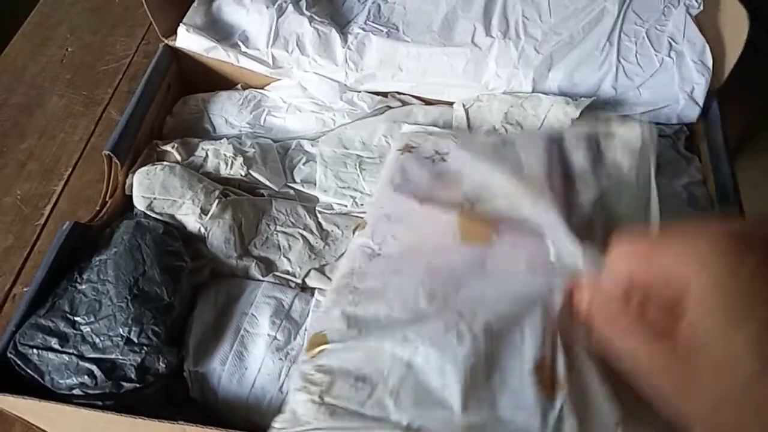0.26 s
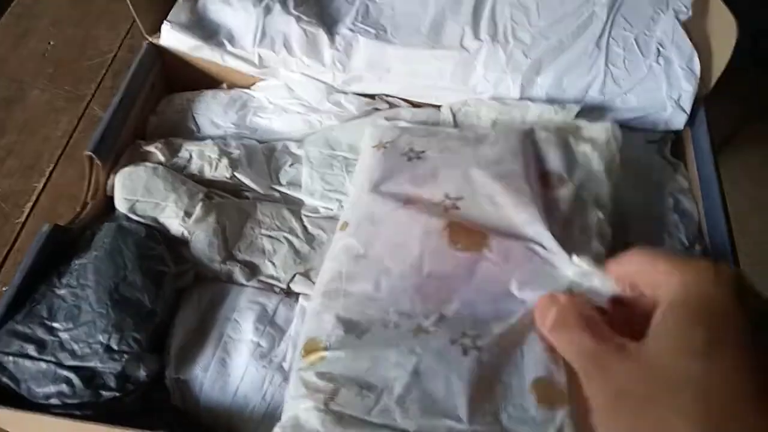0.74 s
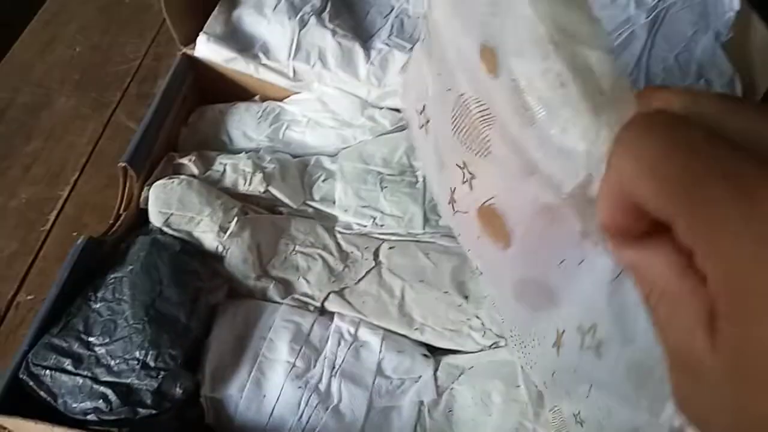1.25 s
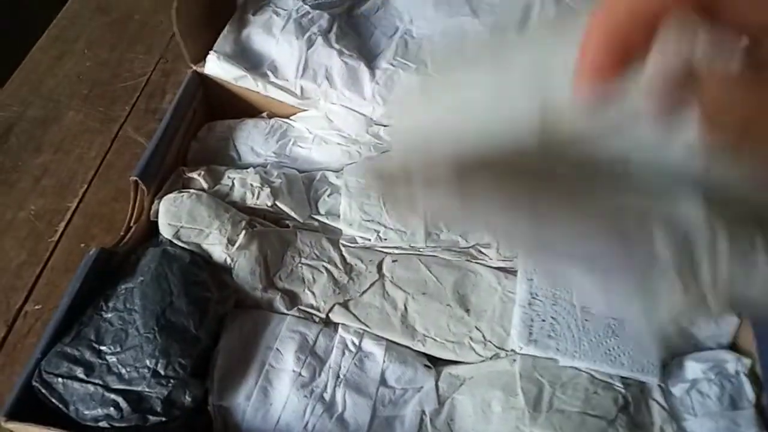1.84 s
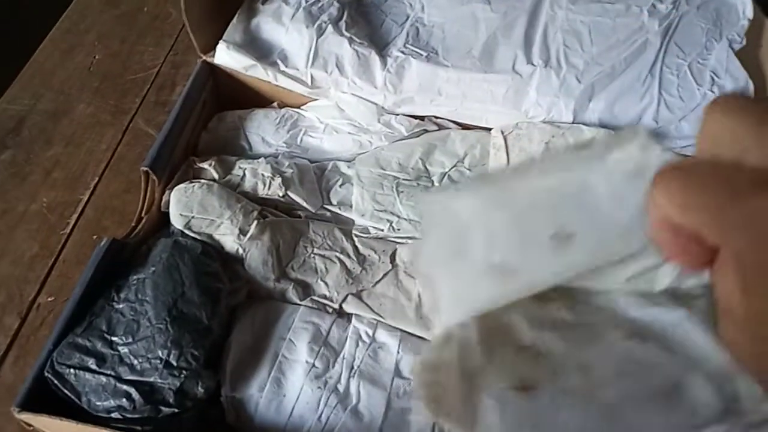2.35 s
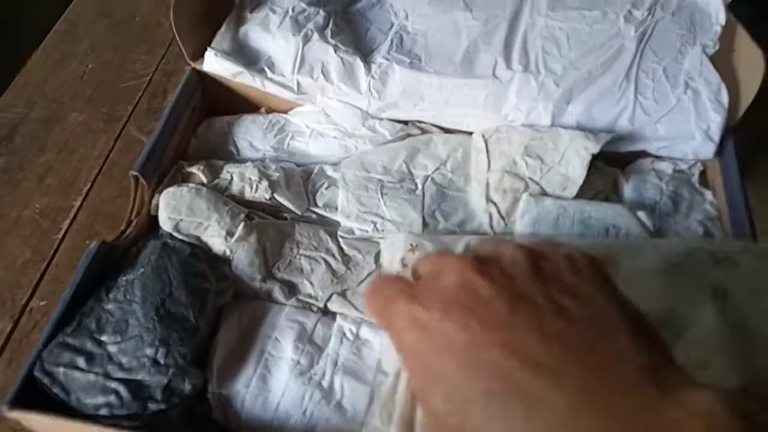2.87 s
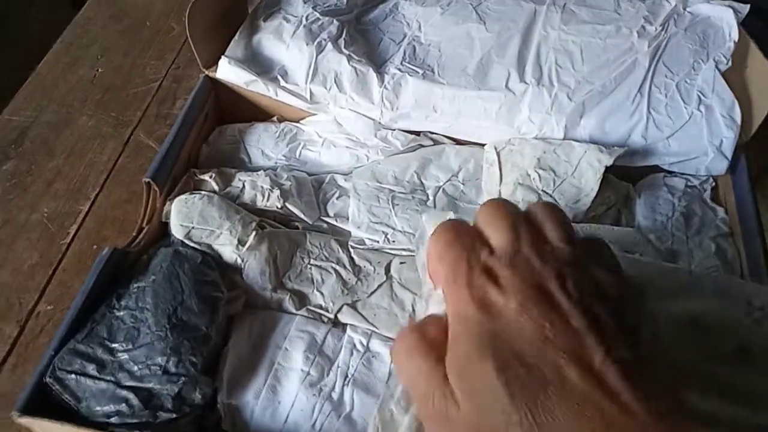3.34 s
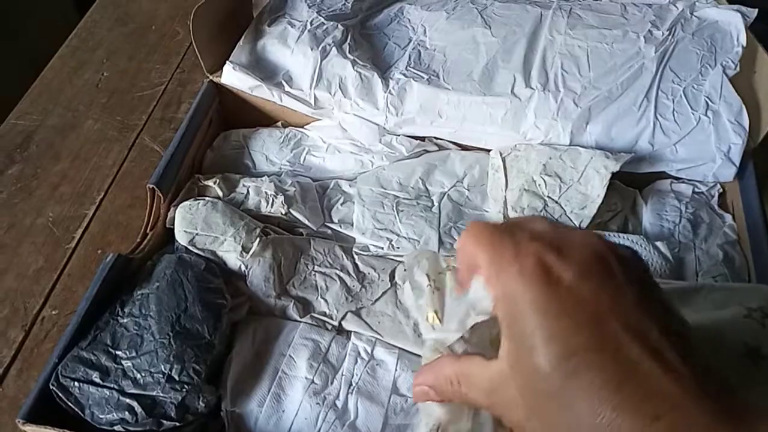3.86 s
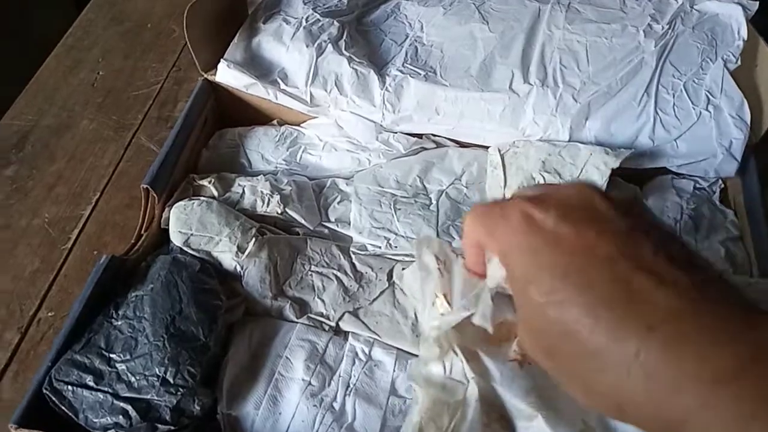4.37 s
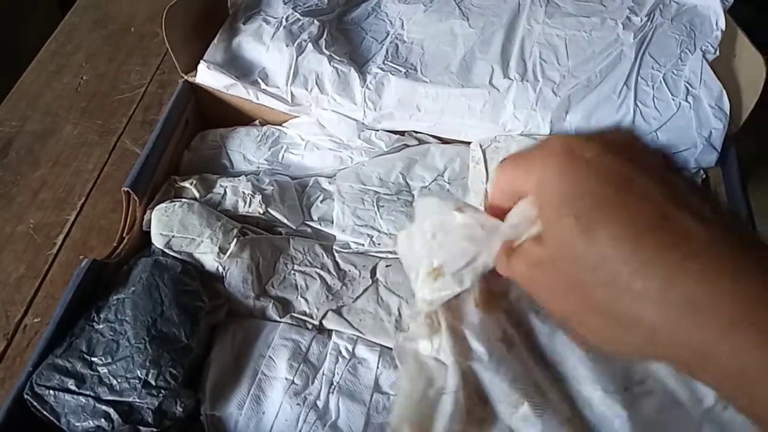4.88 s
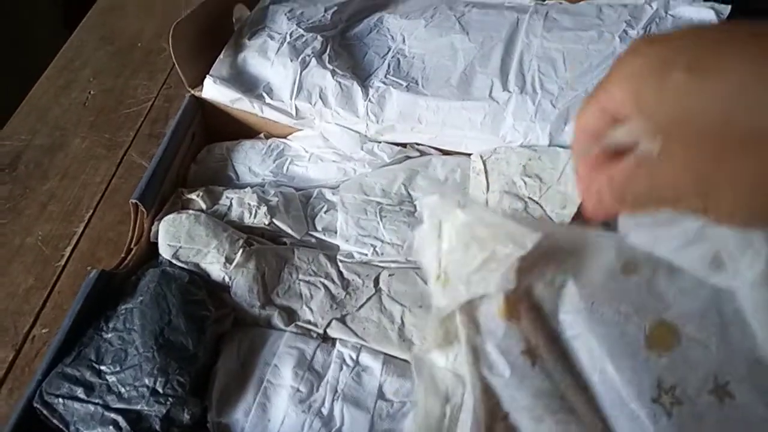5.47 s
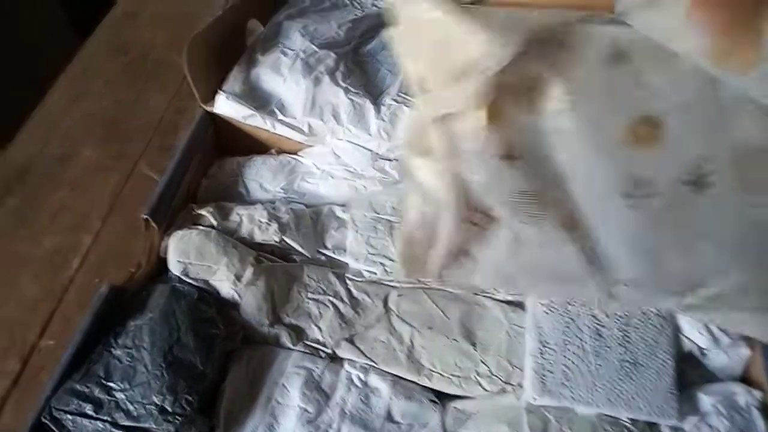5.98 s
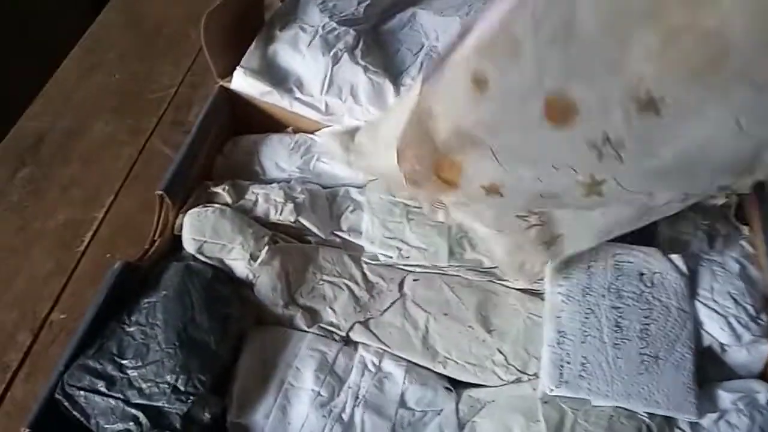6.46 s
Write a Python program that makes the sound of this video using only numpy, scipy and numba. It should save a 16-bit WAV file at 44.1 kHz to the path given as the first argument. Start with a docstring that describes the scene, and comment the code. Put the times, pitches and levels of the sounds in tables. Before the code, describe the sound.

Close, crisp rustling of thin wrapping paper in uneven tugs, full of sharp crackles, with a short hoarse squeal in an early lull.

```python
"""A small quiet room, with a phone's two microphone ports close to a packed box under tissue paper.
A hand crumples and drags the paper: creases are a dense hail of filtered noise bursts, with louder snaps.
The sheet slides as fine hiss and flaps low; bumps of the box are short dying sines.
Hoarse gliding sines make a brief paper squeak early on and a short rising squeal, perhaps a bird, in a
lull; a faint hum wavers behind."""
import sys
import numpy as np
from scipy import signal
from scipy.fft import rfft, irfft
from scipy.io import wavfile
from scipy.ndimage import uniform_filter1d, map_coordinates
from numba import njit

SR = 44100
rng = np.random.default_rng(int(sys.argv[2]) if len(sys.argv) > 2 else 0)


def log_audio(samples):
    """Write samples as a 16-bit WAV file to the path given in sys.argv[1]."""
    # one column per channel
    frames = np.atleast_2d(samples).T
    # limit to full scale, then quantise
    limited = np.clip(frames, -1, 1)
    pcm = np.round(limited * 32767).astype(np.int16)
    wavfile.write(sys.argv[1], SR, pcm)


N = 296382


def undb(db):
    """Amplitude ratio of a level in dB."""
    return 10 ** (np.asarray(db) / 20)


def rms(x):
    """Root mean square over all ports and samples."""
    return np.sqrt(np.mean(x ** 2))


def walk(rate):
    """Random levels held 1 / rate seconds and slewed, scaled to an rms of 1."""
    hold = int(SR / rate)
    steps = np.repeat(rng.standard_normal(N // hold + 1), hold)
    slewed = uniform_filter1d(steps, hold)[:N]
    return slewed / rms(slewed)


def colour(x, points):
    """Causal minimum-phase filter through (hz, db) points, by way of the cepstrum."""
    hz, db = np.transpose(points)
    bins = np.arange(1025) * SR / 2048
    gain_db = np.interp(np.log(bins + 1), np.log(hz), db)
    cepstrum = irfft(np.log(undb(gain_db)))
    cepstrum[1:1024] *= 2  # fold the negative times onto the positive: the filter never rings early
    cepstrum[1025:] = 0
    return signal.fftconvolve(x, irfft(np.exp(rfft(cepstrum))))[:N]


# Quiet room, colour of the hiss; its overall level is set apart: hz, relative_level_db
AIR_COLOUR = [(18, -65), (30, -6), (512, 7), (721, -1), (1810, 5), (2120, -9), (3770, -3), (16000, -39)]
AIR_DB = -62  # rms of the hiss
# Faint hum behind the paper, before its wavering: time_s, level_db
HUM_LEVEL = [(0, -74), (1.2, -63), (1.9, -75), (3.1, -64.5), (3.8, -73), (5, -63.5), (6.72, -84)]


def air():
    """Quiet room noise, separate at each port, and a low hum that wavers in pitch and level."""
    hiss = np.array([colour(rng.standard_normal(N), AIR_COLOUR) for _ in range(2)])
    pitch_hz = 62. + 2.3 * walk(12)
    level_db = np.interp(np.arange(N) / SR, *np.transpose(HUM_LEVEL)) + 4 * walk(9)
    hum = np.sin(2 * np.pi * np.cumsum(pitch_hz) / SR) * undb(level_db)
    return hiss * undb(AIR_DB) / rms(hiss) + hum


ROOM_T60_S, ROOM_DB, ROOM_ALIKE_HZ = 0.17, -12, 614  # decay, tail level, alike at both ports below this


def room(x):
    """Tails of dying noise, alike at both ports in the bass; they change as the hands move about."""
    t, hop = np.arange(int(.4 * SR)) / SR, 8192
    low = signal.butter(2, ROOM_ALIKE_HZ, fs=SR)
    dull = signal.butter(2, 5500., fs=SR)  # paper and cloth soak up the treble
    padded = np.pad(x, ((0, 0), (hop, 2 * hop)))
    wet = np.zeros((2, padded.shape[1] + len(t)))
    for i in range(0, N + hop, hop):  # overlapping windows, each with a fresh tail
        own, both = rng.standard_normal((2, len(t))), rng.standard_normal(len(t))
        tail = own + signal.filtfilt(*low, both - own)
        dying = undb(-60 * t / ROOM_T60_S) * (t > .002)
        tail = signal.lfilter(*dull, tail * dying)
        tail *= undb(ROOM_DB) / np.sqrt(np.sum(tail ** 2, 1, keepdims=True))
        window = padded[:, i:i + 2 * hop] * np.hanning(2 * hop)
        part = signal.fftconvolve(window, tail, axes=1)
        wet[:, i:i + part.shape[1]] += part
    return x + wet[:, hop:hop + N]


# A brief paper squeak early on, then the rising squeal in the lull; levels before wavering,
# hoarseness and placing, octave relative to the note:
# start_s, end_s, start_hz, end_hz, level_db, octave_db
SQUEAL_NOTES = [(0.326, 0.335, 3510, 3460, -33.5, -14), (2.05, 2.105, 2400, 2750, -44, -14),
                (2.195, 2.241, 3750, 4350, -46, -3), (2.084, 2.147, 2750, 3010, -33.5, -13),
                (2.128, 2.297, 2950, 2910, -46, -14), (2.158, 2.262, 3700, 3700, -45.5, -2.5),
                (2.166, 2.324, 3300, 3320, -35.5, -2.5), (2.205, 2.298, 3920, 3940, -40, 0.5),
                (2.23, 2.328, 4210, 4280, -45.5, -2), (2.242, 2.33, 3560, 3710, -40, -8)]


def squeal():
    """Hoarse gliding notes with octaves, mostly on the left; the squeal steps up and splits into strands."""
    t, out = np.arange(N) / SR, 0
    for start, end, start_hz, end_hz, db, octave_db in SQUEAL_NOTES:
        hz = np.interp(t, (start, end), (start_hz, end_hz)) * (1 + 0.00445 * walk(150))
        phase = 2 * np.pi * np.cumsum(hz) / SR
        arch = np.sin(np.pi * np.clip((t - start) / (end - start), 0, 1))
        swell = arch ** 0.27 * undb(db + 3.4 * walk(63))
        # uneven cycles spread each line into a band
        hoarse = 1 + 4.5 * signal.lfilter(*signal.butter(3, 300, fs=SR), rng.standard_normal(N))
        out = out + swell * hoarse * (np.sin(phase) + undb(octave_db) * np.sin(2 * phase))
    return out * undb([[4.], [-7.]])


# Where the paper lies from the ports; the balance is used relative to its mean over time:
# time_s, left_minus_right_db, left_later_ms
PAPER_PLACE = [(0, 3.5, 1.15), (.4, 4.5, 1.19), (.7, 6, 1.18), (1.29, 2.5, 1.3), (1.75, 5.5, 1.2),
               (2.3, 5.5, 1.1), (3.3, 6, 1.167), (4.1, 7, 1.17), (4.8, 4.5, 1.17), (5.2, 2, 1.29),
               (5.8, 4, 1.285), (6.14, 1, 1.32), (6.72, 5.5, 1.36)]


def late(s):
    """Samples by which the left port hears the paper later."""
    when, _, ms = np.transpose(PAPER_PLACE)
    return np.interp(s, when, ms) * SR / 1000


# The hand or the parcel bumps the box: start_s, envelope_peak_db, pitch_hz
BOX_BUMPS = [(3.974, -38, 190), (4.307, -41, 322), (4.532, -36, 240), (5.3, -41, 170), (5.622, -39, 160),
             (5.94, -38.5, 150), (6.228, -39, 210)]
THUMP_S = .011  # a bump is fullest at half this time


def thumps():
    """Soft low sine bumps that die at once; the left port hears them later."""
    t, out = np.arange(N) / SR, np.zeros((2, N))
    for s, db, hz in BOX_BUMPS:
        u = np.maximum(t - s - np.array([[late(s) / SR], [0]]), 0)
        envelope = np.e * u / THUMP_S * 2 * np.exp(-2 * u / THUMP_S)
        out += undb(db) * envelope * np.sin(2 * np.pi * hz * u)
    return out


@njit
def buckle(start, lag, size, pan, hz, sharp, fade, ring, noise):
    """Each crease lets go a bare tick and a longer burst that rings a patch of sheet."""
    out = np.zeros((2, len(noise) + 4096))
    for e in range(len(start)):
        g, damping = np.tan(np.pi * hz[e] / SR), 1 / sharp[e]
        band, low, level = 0., 0., 1.
        ring_gain = np.sqrt(SR * sharp[e] / hz[e] / 8)
        i = start[e]
        while level > .01 and i < len(noise):
            burst = 4 * level * (1 - level) * noise[i]  # swells, then dies
            v = (band + g * (burst - low)) / (1 + g * (g + damping))  # resonant band-pass
            band, low = 2 * v - band, low + 2 * g * v
            tick = level ** 8 * (noise[i] - noise[i - 1])  # the fold itself: at once, brief and bright
            bare = level * level * burst * 2 + tick
            y = (1 - ring) * bare + ring * damping * v * ring_gain
            out[0, i + lag[e]] += size[e] * y * pan[e]  # the left port hears it later
            out[1, i] += size[e] * y / pan[e]
            level *= fade[e]
            i += 1
    return out[:, :len(noise)]


# Colour of each microphone port: hz, gain_db
LEFT_MIC = [(40, -18.5), (120, -17.5), (330, -9), (550, -12), (820, -13), (1080, -8), (1520, -12.5),
            (2100, -5), (3300, -3), (4900, -7.5), (6400, -1), (8600, -4), (12800, -26.5), (15000, -9.5),
            (16000, 2), (17500, -52)]
RIGHT_MIC = [(40, -25), (120, -16), (330, -13), (520, -15), (1150, -17.5), (1450, -8), (1750, -17.5),
             (2200, -12.5), (2700, -15), (6500, -10), (8100, -20.5), (11500, -3), (13800, -12), (15000, -4),
             (16000, -3), (17500, -46)]


def creases(s, size, pan_db, hz, ms, sharp, ring, spread_s):
    """Bursts from scattered places on the sheet, through the two ports."""
    scatter = SR * spread_s * rng.standard_normal(len(s))
    lag = np.clip(late(s) + scatter, 0, 400).astype(int)
    fade = np.exp(-1000 / (ms * SR))
    out = buckle((s * SR).astype(int), lag, size, undb(pan_db / 2), np.clip(hz, 60., 16000.),
                 sharp + 0 * s, fade, np.clip(ring, 0., 1.), rng.standard_normal(N))
    return np.array([colour(out[0], LEFT_MIC), colour(out[1], RIGHT_MIC)])


# Single loud snaps; the peak is that of the two ports' mean before the room, the balance is
# used relative to the mean of all snaps: start_s, peak_db, ring_hz, left_minus_right_db
LOUD_SNAPS = [(0.045, -19, 2530, 17), (0.1486, -35, 1800, 12), (0.206, -31, 4010, 1),
              (0.2278, -24, 6500, -2), (0.2322, -15.5, 6200, -1), (0.243, -19, 4000, 0),
              (0.261, -24, 6500, 0), (0.2896, -21, 5830, 4), (0.3129, -28, 6600, 3), (0.396, -20, 6730, 0),
              (0.503, -18, 6500, 4), (0.56, -25, 6100, -4), (0.653, -15.5, 4100, 10),
              (0.6734, -19, 2720, 1), (0.6902, -15, 3600, 9), (0.708, -15.5, 3800, 6),
              (0.984, -18, 7400, -2), (1.1939, -14, 6590, -4.5), (1.257, -17, 6200, 6),
              (1.2996, -19, 6400, 2.5), (1.3509, -13, 6300, -1), (1.39, -20, 6600, 6),
              (1.5087, -11.5, 3880, 1), (1.5993, -18, 3540, 4), (1.729, -22, 3000, -3),
              (1.7426, -17, 2600, -7), (1.777, -24, 2420, 13), (1.9224, -16.5, 2720, 5),
              (1.9456, -16.5, 4960, 0), (2.359, -23.5, 5940, 11), (2.392, -17, 3500, 6.5),
              (2.5883, -16.5, 6430, 16), (2.599, -19.5, 7620, 16.5), (2.648, -22, 6050, 9),
              (2.721, -21, 6020, 5.5), (2.739, -19.5, 6320, 14), (2.82, -19, 3770, 20),
              (2.943, -22.5, 7850, 4), (3.132, -12.5, 6230, 9), (3.141, -14, 1970, 9),
              (3.2534, -17, 5950, 6), (3.313, -14.5, 2000, 11), (3.405, -24, 7000, 15),
              (3.461, -22.5, 4200, 2.5), (3.6317, -12, 6550, -3), (3.678, -17, 3560, 0),
              (3.715, -12, 4000, 3), (3.949, -16, 2600, 3), (4.158, -12, 6650, 4), (4.183, -10.5, 6200, 3),
              (4.186, -16, 1050, 5), (4.206, -14.5, 3530, 5.5), (4.2943, -21, 6020, -7),
              (4.2992, -21, 6340, 0), (4.315, -19, 6400, 14), (4.404, -13.5, 6350, 19),
              (4.4454, -20, 6460, 9), (4.6845, -17.5, 6050, 12), (4.787, -17.5, 3900, 9.5),
              (4.822, -19.5, 3420, 10), (4.981, -23, 6700, 11), (4.99, -18, 900, 9), (5.008, -24, 2300, 18),
              (5.032, -21, 6300, -2), (5.0752, -15.5, 7000, -3), (5.104, -16, 4330, 3),
              (5.1703, -21.5, 6600, 3), (5.187, -16, 6330, -5.5), (5.209, -19.5, 6460, 9),
              (5.231, -24, 850, -2), (5.254, -21, 6600, 1), (5.2867, -13.5, 6500, 3),
              (5.375, -19, 7040, 10.5), (5.395, -15.5, 6500, 3), (5.435, -15.5, 6300, 2),
              (5.466, -20, 6760, 4.5), (5.483, -15, 3540, 5), (5.523, -12.5, 7500, 6),
              (5.5427, -22, 6740, -12), (5.6324, -12.5, 6360, 3), (5.677, -16, 6340, 9),
              (5.7311, -14.5, 3330, -10), (5.757, -10, 11200, -5), (5.9442, -21, 6060, 1.5),
              (5.993, -16.5, 6480, -4.5), (6.0112, -19.5, 6200, 6), (6.0391, -15.5, 2770, -7),
              (6.0659, -15.5, 6600, -1), (6.105, -31, 7000, 2), (6.1127, -26, 8260, -3),
              (6.143, -18.5, 2920, -5.5), (6.149, -19.5, 6760, 3), (6.157, -19.5, 6000, -7),
              (6.174, -18.5, 6600, -3), (6.188, -15, 2790, -4), (6.215, -21, 4230, 1),
              (6.2329, -12.5, 6860, -1), (6.244, -16, 6500, -2), (6.278, -13, 2200, -1),
              (6.3115, -15, 11100, -6), (6.345, -17, 5240, -6), (6.386, -17, 3260, 0),
              (6.4099, -12, 2220, -3), (6.558, -13, 12000, -1), (6.577, -22, 900, 5), (6.595, -21, 2400, 5),
              (6.6321, -12, 2320, 10), (6.693, -18, 7510, 14)]
SNAP_SHARP, SNAP_RING = 3.3, .33  # dry paper: a broad resonance (Q), a small share of the snap


def snaps():
    """Large creases that give way alone; each is scaled to its peak level."""
    s, db, hz, pan = np.transpose(LOUD_SNAPS)
    out = creases(s - .0007, 1 + 0 * s, pan - np.mean(pan), hz, 2.01 + 0 * s, SNAP_SHARP, SNAP_RING, .00008)
    first = ((s - .001) * SR).astype(int)
    peak = np.array([np.abs(out[:, i:i + 300].mean(0)).max() for i in first])
    sounding = np.maximum(np.searchsorted(first, np.arange(N), "right") - 1, 0)  # index of the snap
    return out * (undb(db) / peak)[sounding]


# Tugs of the hand on the paper; fade is the time to drop 20 dB, never under the shortest fade:
# start_s, swell_s, fade_s, top_effort_db
HAND_TUGS = [(0.0, 0.0045, 0.3, -49), (0.02, 0.021, 0.06, -39.5), (0.17, 0.044, 1, -57),
             (0.222, 0.047, 0.3, -43), (0.293, 0.02, 0.57, -37.5), (0.39, 0.11, 0.26, -38),
             (0.591, 0.054, 0.15, -38.5), (0.685, 0.0089, 0.33, -34.5), (0.753, 0.14, 0.28, -33),
             (0.978, 0.0042, 0.6, -37.0), (1.033, 0.084, 0.17, -33.5), (1.192, 0.0097, 0.15, -32),
             (1.243, 0.0088, 0.2, -33), (1.34, 0.082, 0.11, -32.5), (1.474, 0.048, 0.08, -31),
             (1.589, 0.005, 0.15, -37), (1.651, 0.083, 0.2, -36), (1.79, 0.038, -0.2, -44),
             (1.92, 0.031, 0.22, -35), (2.036, 0.07, -0.5, -45), (2.24, 0.07, 0.6, -56),
             (2.328, 0.16, 0.32, -30.5), (2.583, 0.0062, 0.17, -35.5), (2.723, 0.13, 0.1, -32),
             (2.947, 0.11, 0.67, -34), (3.127, 0.0028, 0.19, -33), (3.25, 0.062, 0.16, -38.5),
             (3.496, 0.046, -0.94, -41), (3.647, 0.084, 0.12, -34), (3.752, 0.071, 0.2, -33.5),
             (3.948, 0.037, 0.27, -31.5), (4.117, 0.072, 0.14, -36), (4.296, 0.021, 0.15, -34),
             (4.348, 0.18, 0.33, -29.5), (4.742, 0.067, 0.07, -34.5), (4.894, 0.108, -0.28, -37.5),
             (5.028, 0.078, 0.15, -38.5), (5.169, 0.0061, 0.5, -44), (5.284, 0.0056, 0.28, -34),
             (5.322, 0.1, 0.02, -34.5), (5.462, 0.053, 0.47, -34), (5.564, 0.058, 0.15, -34.5),
             (5.727, 0.027, 0.27, -28), (5.938, 0.0081, 0.13, -36.5), (5.989, 0.043, -0.37, -36.5),
             (6.142, 0.023, 1.1, -44.5), (6.19, 0.03, 0.3, -44), (6.225, 0.01, 0.08, -32.5),
             (6.256, 0.018, 0.08, -32.5), (6.305, 0.015, 0.5, -36.5), (6.38, 0.1, 0.1, -31.5),
             (6.547, 0.055, 0.16, -35.5), (6.665, 0.047, -1.5, -36)]
BITE_DB, REST_DB = 6.5, -75  # a tug sets in at once this far under its top; level of a still hand
SOFTEN_S, SHORTEST_FADE_S = 0.0071, .04


def effort(t):
    """Level in dB of all tugs together, at times 1 ms apart: bite, swell, fade; a still hand between."""
    start, swell, fade, top = np.transpose(HAND_TUGS)[:, :, None]
    u = t - start
    rise_db = BITE_DB * (1 - u / swell)
    fall_db = 20 * (u - swell) / np.maximum(fade, SHORTEST_FADE_S)
    db = top - np.where(u < swell, rise_db, fall_db)
    power = np.sum(undb(2 * db) * (u >= 0), axis=0)
    return 10 * np.log10(uniform_filter1d(power, int(SOFTEN_S * 1000) + 1) + undb(2 * REST_DB))


def crease_hail(at, push, count=20000):
    """Dense creases in flurries, some much larger; a slow hand breaks fewer."""
    when, large, side, pitch, length, keep = rng.random((count, 6)).T
    s = when * N / SR
    busy = np.clip(undb(1.3 * (np.interp(s, at, push) + 32.)), .12, 1)  # share of creases that break
    flurry_db = 0.5 * walk(13) + 1.37 * walk(70)
    largest_db = 13  # before the flurries
    size_db = np.minimum(-3.6 * np.log(large + 1e-9), largest_db) + flurry_db[(s * SR).astype(int)]
    size = undb(size_db) * (keep < busy) / np.sqrt(busy)
    return creases(s, size, 6 * (side - .5), 200 * 70 ** pitch, 0.29 * 6 ** length, 3.7, 0.36, .00013)


def sheet_slide():
    """Sheet sliding on sheet: fine hiss, duller than the creases, later at the left port; rms 1."""
    slide = rng.standard_normal(N + 100)
    ahead = map_coordinates(slide, [np.arange(N) + late(np.arange(N) / SR)], order=3)
    hiss = np.array([colour(slide[:N], LEFT_MIC), colour(ahead, RIGHT_MIC)])
    hiss = signal.lfilter(*signal.butter(1, 7000., fs=SR), hiss)
    return hiss / rms(hiss)


# The bunched sheet encloses pockets of air that ring for a while; the gain is that of the
# ring added to the bare rustle: start_s, end_s, pitch_hz, width_hz, gain_db
AIR_POCKETS = [(1.33, 1.434, 6500, 900, -1), (3.94, 4.3, 1010, 180, -2), (4.49, 4.724, 1000, 170, 1.5),
               (6.12, 6.458, 2200, 400, -0.5), (6.564, 6.67, 2350, 500, 1.5)]


def ring_pockets(out):
    """Adds the rustle's own narrow resonance in each air pocket while it is held."""
    t = np.arange(N) / SR
    for start, end, hz, width, db in AIR_POCKETS:
        held = np.sqrt(np.sin(np.pi * np.clip((t - start) / (end - start), 0, 1)).clip(0))
        out = out + signal.lfilter(*signal.iirpeak(hz, hz / width, fs=SR), out) * held * undb(db)
    return out


# Bands of crackle, rustle, scrape and flap, in that order: low_hz, high_hz
PAPER_BANDS = [(8500, 15500), (4600, 6000), (700, 2200), (100, 600)]
# One value per band: level at a usual tug, relative to its effort [dB]
BAND_LEVEL = (-1.5, -3, -5, -17.5)
# One value per band: rise per rise of effort [dB per dB]
BAND_FOLLOW = (0.93, 0.88, 0.79, 1)
# One value per band: spread of its own random wandering [dB]
BAND_WANDER = (0.91, 0.98, 1.55, 3.2)
USUAL_DB = -37  # effort of a usual tug
# Level of the two low bands over their usual share: time_s, scrape_db, flap_db
LOW_BODY = [(0.0, 6, 2), (0.19, 8, 14), (0.26, 0.5, -1), (0.9, -0.5, 0.5), (1.2, -7, -7.5), (1.7, 1.5, 0.5),
            (2.11, 0, -1), (2.17, -15, -9), (2.33, -10, -8), (2.4, -0.5, -4.5), (3.1, -0.5, -5),
            (3.35, -1, -2), (3.48, -3, 3), (3.62, 1, 2.5), (3.999, 1.5, -2.5), (4.6, 1.5, -3.5),
            (4.87, -3.5, -8), (5.05, -1, 8.5), (5.3, -2, 5), (5.6, -6, 0), (5.76, -6, -2), (5.95, -2.5, 9),
            (6.1, -8, -6), (6.24, -4.5, 6.5), (6.34, -4, -1.5), (6.48, -1.5, -2.5), (6.6, -1.5, -20),
            (6.72, -3, -11)]


def crumple():
    """Crease hail and sliding hiss; the hand's effort drives the level of each band."""
    at = np.arange(0, N / SR, .001)
    push = effort(at)
    hail = crease_hail(at, push)
    paper = hail / rms(hail) + sheet_slide() * undb(-4.0 + 2.03 * walk(45))
    t, hz, spectrum = np.arange(N) / SR, np.arange(N // 2 + 1) * SR / N, rfft(paper)
    centres = np.log([np.sqrt(lo * hi) for lo, hi in PAPER_BANDS[::-1]])
    when, *body = np.transpose(LOW_BODY)
    fuller_db = [0, 0] + [np.interp(t, when, db) for db in body]
    over_usual_db = np.interp(t, at, push) - USUAL_DB
    out = 0
    for k, (lo, hi) in enumerate(PAPER_BANDS):
        share = np.interp(np.log(hz + 1), centres, np.arange(4) == 3 - k)  # neighbours cross-fade
        usual = rms(irfft(spectrum.mean(0) * ((hz > lo) & (hz < hi)), N))
        db = USUAL_DB + BAND_LEVEL[k] + BAND_FOLLOW[k] * over_usual_db
        db = db + fuller_db[k] + BAND_WANDER[k] * walk(20)
        out = out + irfft(spectrum * share, N) * undb(db) / usual
    out = ring_pockets(out)
    lean_db = np.interp(t, *np.transpose(PAPER_PLACE)[:2])
    lean_db -= np.mean(lean_db)
    return out * undb(np.array([lean_db, -lean_db]) / 2)


def scene():
    """Paper, box and squeals sound in the room; the quiet air is added dry."""
    return room(crumple() + snaps() + thumps() + squeal()) + air()


EDGE_HZ, TOP_HZ = 15840, 16979


def record(dry):
    """The recorder rounds the loudest peaks, cuts the deep bass and drops steeply at the top of its band."""
    edge = signal.ellip(10, .5, 28, EDGE_HZ, fs=SR, output="sos")
    top = signal.ellip(8, .2, 70, TOP_HZ, fs=SR, output="sos")
    bass = signal.butter(3, 50., "high", fs=SR, output="sos")
    rounded = .7 * np.tanh(dry / .7)
    return signal.sosfilt(np.vstack([bass, edge, top]), rounded)


dry = scene()
out = record(dry)
log_audio(out)
```